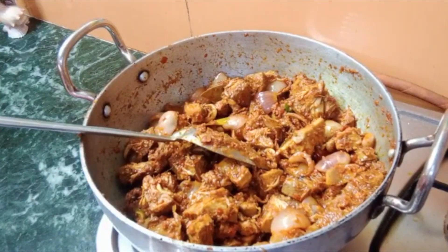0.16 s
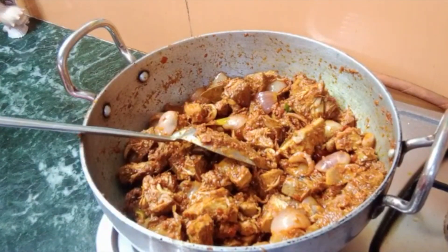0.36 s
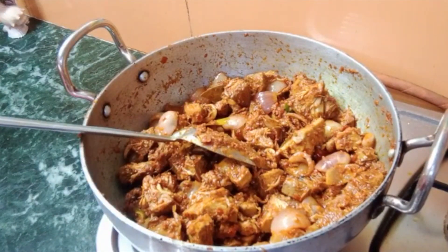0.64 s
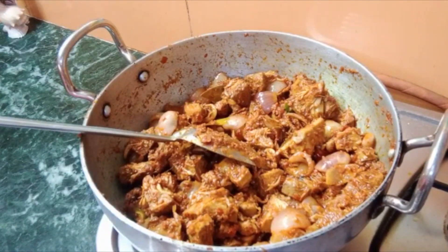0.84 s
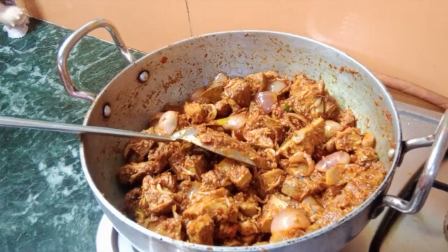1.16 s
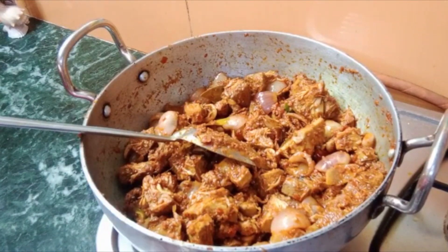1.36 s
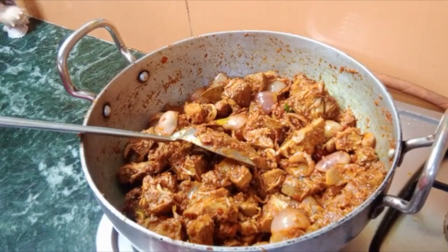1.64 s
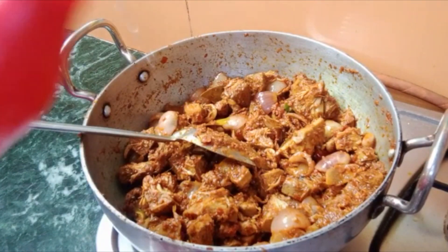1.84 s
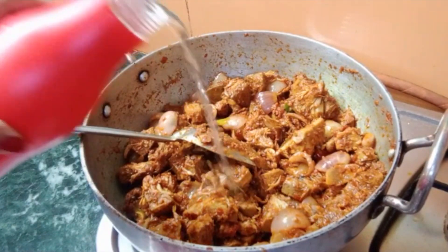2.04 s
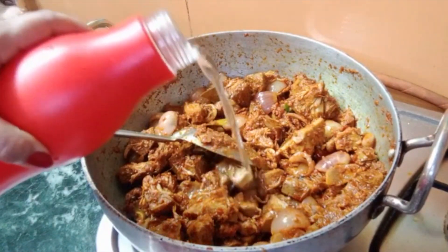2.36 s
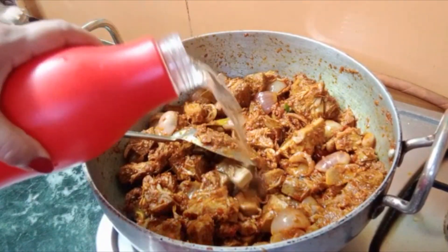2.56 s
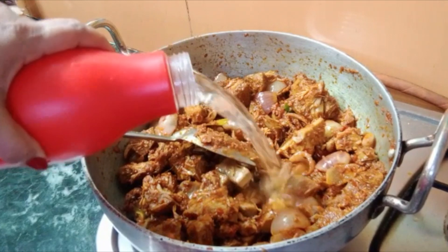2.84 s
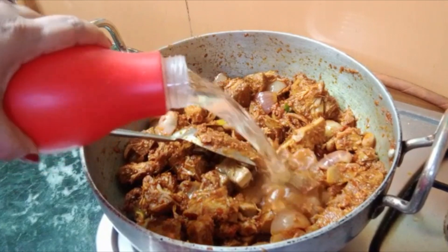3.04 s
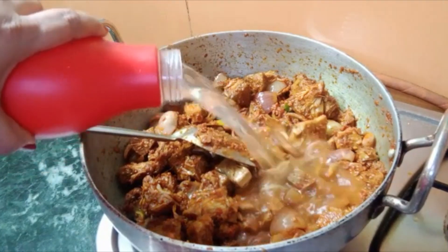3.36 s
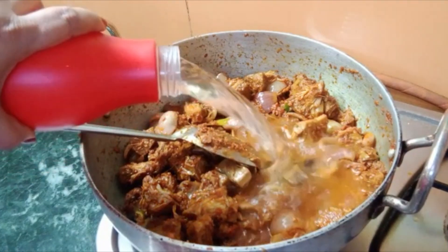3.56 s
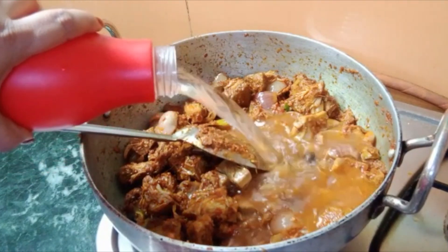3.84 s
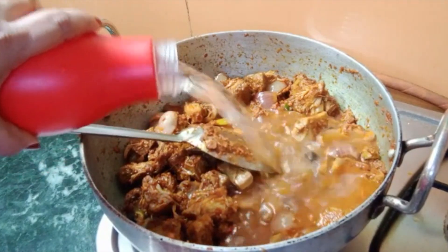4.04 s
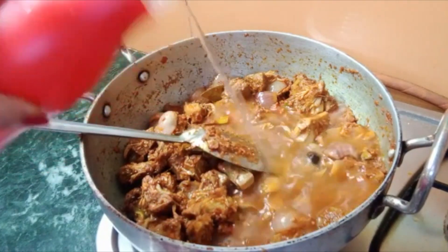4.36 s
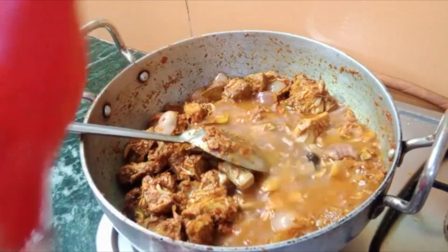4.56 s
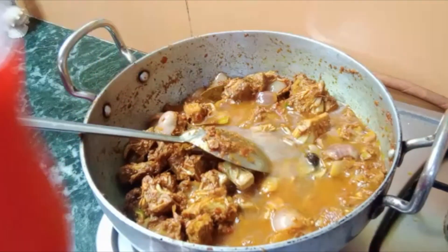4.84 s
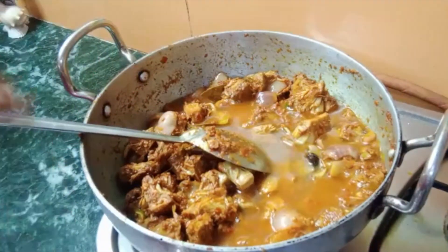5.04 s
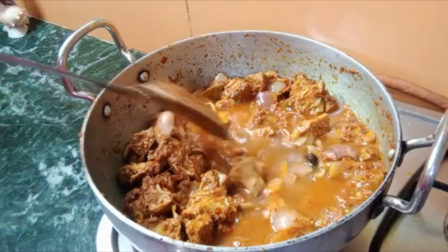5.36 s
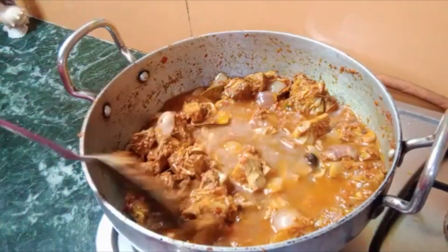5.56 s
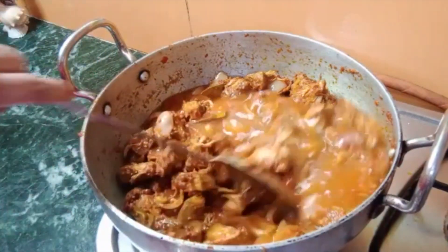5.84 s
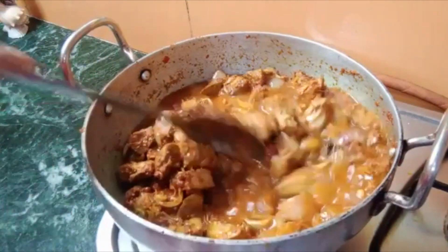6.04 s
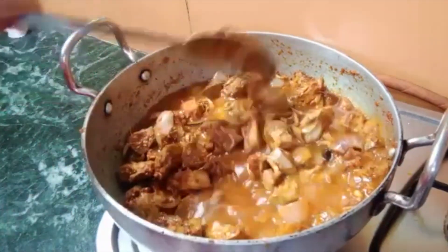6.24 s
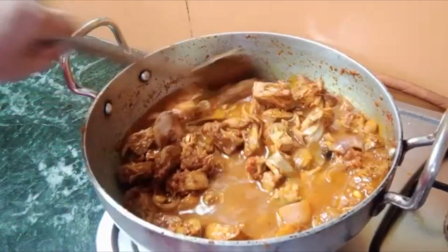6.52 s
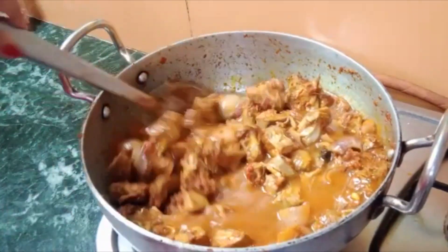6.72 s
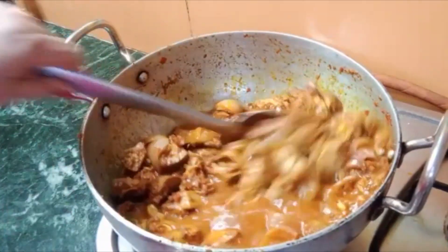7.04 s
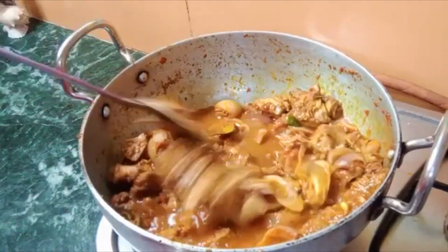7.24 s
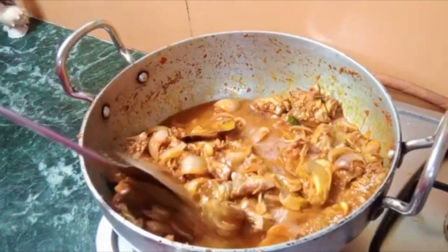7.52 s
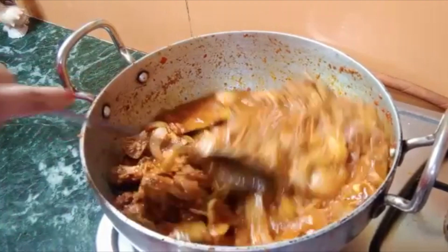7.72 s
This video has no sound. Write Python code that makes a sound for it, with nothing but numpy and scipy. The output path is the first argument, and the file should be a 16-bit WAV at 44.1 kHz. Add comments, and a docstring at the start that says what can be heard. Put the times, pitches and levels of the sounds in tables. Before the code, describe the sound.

Spiced food sizzles in a metal pan, a spatula clanks, water gurgles in and dulls the hiss, then stirring knocks and scrapes flare the frying up.

```python
"""Frying in a wok

Spiced meat fries in a metal wok over a gas flame: steam bursts hiss, gravy bubbles sputter and burble.
A dropped steel spatula rings the pan and its own blade; poured water gurgles and comes to a simmer.
Then the spatula knocks and scrapes through the food, and the hot metal flares up again.
Hiss and flame are shaped noise, bubbles are short rising tones, and metal is a set of fading notes.
A small kitchen adds short reflections."""
import sys
import numpy as np
from scipy import signal
from scipy.fft import rfft, irfft, next_fast_len
from scipy.io import wavfile

SR = 44100
rng = np.random.default_rng(int(sys.argv[2]) if len(sys.argv) > 2 else 0)


def transcribe(signal):
    """Save signal, clipped to [-1, 1], as a 16-bit WAV file at the path in sys.argv[1]."""
    frames = np.atleast_2d(signal).T
    limited = np.clip(frames, -1, 1)
    pcm = np.round(limited * 32767).astype(np.int16)
    wavfile.write(sys.argv[1], SR, pcm)


N = 347949
TIME = np.arange(N) / SR  # s

# All levels below are relative: the functions add fixed offsets when they mix.
# How hard the food fries; water quenches it, stirring bares hot metal:
# [t/s, steam hiss level/dB, gravy sputter level/dB]
FRYING = [(0, -37.5, -30.5), (2.3, -36.5, -35), (3.6, -40, -33.5), (4.25, -42.5, -47), (4.65, -43.5, -35),
          (4.95, -47, -36), (5.3, -46, -34), (5.48, -55.5, -34.5), (5.8, -40, -40), (6.085, -52.5, -50),
          (6.115, -62, -38.5), (6.33, -40, -42.5), (6.435, -42, -40), (6.465, -36.5, -23.5),
          (6.9, -35.5, -31.5), (7.27, -40, -33.5), (7.55, -49.5, -39.5), (7.89, -61, -45)]
# How far water has quenched the metal: [t/s, share 0-1]
WETNESS = [(3, 0), (4.1, 0.54), (6.3, 0.67), (6.6, 0.06)]
# Liquid hitting bare hot metal throws up extra spray: [t/s, level/dB, rise/(dB/s), fall/(dB/s)]
FLASHES = [(3.95, -38.5, 6, 10), (6.42, -29, 86, 15)]
# Colour of the steam hiss: [f/Hz, level/dB]
HISS_COLOUR = [(300, -39), (880, -18), (1100, -13), (1500, 1), (2300, -2), (2900, 0), (4200, -1),
               (5600, -2), (7300, -2.5), (8500, -8), (12000, -12)]
# Colour of the finest spray: [f/Hz, level/dB]
SPRAY_COLOUR = [(4000, -19), (6500, -2), (8500, 2.5), (11000, -1.5), (15500, -2)]
# Bubble sizes in the sputter: [f/Hz, level/dB]
SPUTTER_SIZES = [(2700, -5.5), (3100, -6), (3500, -6.5), (3950, -7), (4450, -14), (5000, -9), (5600, -5.5)]
# Hollow of the wok, as resonances: [f/Hz, width/Hz, level/dB]
BOWL_RESONANCES = [(708, 50, -4.5), (1085, 180, -3), (1258, 125, 5)]
# Colour of the gas flame: [f/Hz, level/dB]
FLAME_COLOUR = [(30, -15), (50, -11), (65, 1.5), (115, -0.5), (150, 7.5), (190, 1.5), (270, -7),
                (500, -5.5), (900, -31), (2500, -58)]
# Pockets of steam burbling under the food: [t/s, level/dB]
BURBLES = [(0.025, -34), (0.109, -42), (0.231, -32), (0.35, -26.5), (0.524, -37), (0.709, -35),
           (1.014, -36), (1.324, -43), (1.41, -42), (1.577, -31.5), (1.795, -40), (1.92, -33), (2.4, -40),
           (2.645, -34.5), (2.902, -36), (5.808, -36), (6.086, -37), (6.812, -34), (6.99, -41),
           (7.424, -35)]
# Spatula and food striking the pan: [t/s, level/dB, lowest f/Hz, highest f/Hz, chatter/s,
# clatter t60/s, wok ring level/dB, favoured note f/Hz, blade ring level/dB]
KNOCKS = [(0.321, -12.5, 360, 7000, .003, 0.22, -5.5, 395, -2),
          (0.33, -13.5, 454, 9000, 0.04, 0.25, -13, 1690, 7.5),
          (0.41, -17.5, 600, 6500, .012, 0.14, -5, 1255, -6),
          (0.445, -27, 416, 990, 0.0044, 0.081, -12, 675, -30),
          (3.091, -18, 150, 600, .005, .06, -16, 370, -40),
          (3.0909, -21.5, 1200, 2800, .007, 0.079, -8, 1690, -30),
          (5.856, -19, 400, 1820, .0025, 0.079, -8, 1255, -40),
          (5.932, -22, 480, 1000, .006, .15, 6, 835, -40),
          (6.271, -15, 189, 2300, 0.0051, 0.22, -2, 575, -23),
          (6.535, -16, 276, 695, .006, .14, 0, 370, -27), (6.575, -9, 160, 1100, .0073, 0.29, -7, 222, -40),
          (6.5955, -8.5, 170, 3580, 0.007, 0.22, -6, 1255, -22),
          (7.605, -12, 1000, 3800, 0.0076, 0.15, -5, 1420, -32),
          (7.6045, -15.5, 270, 557, .003, 0.071, -4, 370, -43),
          (7.61, -13.5, 440, 750, .004, 0.13, 10, 620, -40),
          (7.6121, -15.5, 1700, 2950, .006, .14, 2, 2620, -19),
          (7.636, -24.5, 1500, 7000, .004, 0.18, -10, 2790, -17),
          (7.742, -23, 1080, 1750, .012, 0.15, -13, 1240, -40),
          (7.8025, -17, 520, 1260, .003, .1, -1, 835, -40),
          (7.8128, -16, 644, 1500, .0035, 0.12, -2, 835, -40),
          (7.816, -24.5, 1900, 4870, .01, 0.13, 1, 4590, -40)]
# Notes of the wok, damped by the food: [f/Hz, level/dB, t60/s]
WOK_MODES = [(223.4, 0, .14), (297, 2, .11), (374, 3, 0.11), (508, -1, 0.11), (580, 0.5, 0.16),
             (683, 1, 0.1), (833, -3.5, 0.13), (1128, 0.5, 0.15), (1261, 2.5, 0.15), (1437, -2.5, 0.17),
             (1710, 0.5, 0.11), (1956, 0, 0.13), (2300, -4, .12), (2636, 2, .125), (2760, -4, .11),
             (3070, -4, .12), (3350, -9, 0.12), (3630, -1.5, 0.13), (4390, -2, 0.08)]
# Notes of the steel blade: [f/Hz, level/dB, t60/s]
BLADE_MODES = [(5335, 9, 0.15), (5650, 2.5, 0.13), (6330, -2, .12), (7959, 13, .15), (8845, -4, .12),
               (10981, 7, 0.11), (12610, -2, .12), (14980, -10, 0.082)]
# Drops spitting on hot metal at set times: [t/s, level/dB, f/Hz]
SPITS = [(2.305, -27, 10000), (3.361, -43, 3310), (3.428, -29.5, 3600), (3.464, -30, 3300),
         (3.816, -33.5, 4070), (3.996, -32, 4200), (4.034, -25.5, 3700), (4.059, -29, 6400),
         (4.287, -33, 4120), (4.37, -24.5, 4200), (4.492, -33, 3170), (4.65, -32, 5240), (5.034, -32, 3050),
         (5.117, -34, 3150), (5.263, -21, 1340), (5.266, -26, 3600), (5.488, -21, 1280), (5.554, -33, 5160),
         (5.6, -43, 5100), (6.11, -36, 3320), (6.197, -39, 3130), (6.254, -31, 3920), (6.83, -24.5, 3220)]
# Surges of the pour, then of the stirred gravy: [peak t/s, level/dB, fall/(dB/s)]
SURGES = [(2.949, -33.5, 17), (3.56, -31.5, 23.5), (4.2, -34.5, 15), (4.68, -34, 23), (5.05, -36, 21),
          (5.98, -33.5, 74), (6.68, -33, 32)]
# Gulps of the falling stream and wet thumps of stirred gravy: [t/s, level/dB, starting f/Hz]
GULPS = [(2.959, -30.5, 550), (3.092, -19, 173), (3.094, -25, 343), (3.111, -23.5, 550), (3.52, -41, 407),
         (4.119, -32, 310), (4.22, -30, 293), (4.248, -35, 229), (4.304, -34, 204), (4.329, -23, 166),
         (5.855, -23.5, 308), (5.878, -24.5, 238), (5.916, -24, 492), (5.975, -28, 270),
         (6.231, -30.5, 225), (6.27, -23.5, 225), (6.281, -23, 564), (7.756, -26, 298), (7.769, -23.5, 598),
         (7.771, -29, 188), (7.787, -26, 298), (7.802, -21, 238)]
# Gravy runs over a hot spot and a patch of like-sized bubbles fizzes up:
# [t/s, length/s, level/dB, first f/Hz, last f/Hz, pitch spread/octaves]
PATCHES = [(4.638, 0.29, -32, 1630, 1720, .05), (4.718, 0.55, -38.5, 3000, 3120, 0.056),
           (5.21, 0.19, -37, 3470, 4300, 0.18), (5.545, .12, -36, 4800, 5900, 0.33),
           (5.793, 0.068, -34, 3700, 3200, 0.32), (6.076, 0.33, -39.5, 5430, 5240, 0.082),
           (6.102, 0.12, -43, 3600, 3470, .06), (6.361, 0.15, -37, 1620, 2380, 0.13),
           (6.621, 0.54, -36, 612, 1036, 0.214), (6.666, 0.2, -31, 5750, 5700, .12),
           (6.792, 0.25, -26.5, 3250, 2850, 0.16), (6.951, 0.37, -32, 3370, 4700, 0.18),
           (7.35, 0.22, -42, 2070, 2030, 0.035), (7.437, 0.2, -45, 3100, 3940, .1)]
# Spatula dragged over the metal: [t/s, length/s, level at the end/dB, swell/dB,
# first f/Hz, last f/Hz, bowl ring level/dB]
SCRAPES = [(5.868, 0.071, -22, 4, 300, 744, -20), (5.96, 0.039, -33, 9, 754, 724, -5),
           (6.285, 0.046, -31, 3, 450, 567, -17), (6.456, 0.01, -22, 8, 2600, 3080, -5),
           (6.49, 0.122, -28.5, 4.5, 2800, 1890, 11.5), (6.61, 0.026, -28, -4, 3300, 3300, -9),
           (7.748, 0.1, -27.5, 0.5, 292, 666, -31)]
# Colour the microphone adds: [f/Hz, level/dB]
MICROPHONE_COLOUR = [(30, -18), (70, -2.5), (5700, 0), (6300, -3.5), (6800, 1), (7400, -2), (8100, -14),
                     (9000, -6.5), (11000, -7.5), (13800, -17), (15100, -7)]

SPRAY_DB, SPRAY_FOLLOWS = -36.5, 0.81  # finest spray at the start; share of the hiss's swing
HISS_PATCHY_DB = 3.4  # depth of the patches at full wetness
SPUTTER_SPREAD_DB, GURGLE_SPREAD_DB = 12, 11  # how far bubble strengths differ
SIMMER_DB, SIMMER_FOLLOWS = -30, 0.38  # hum of the bowl at the start; share of the sputter's swing
SWARM_DB, SWARM_FOLLOWS = -34, 0.83  # small bubbles, likewise
BOIL_PEAK_S, BOIL_CLUMP_DB = 4.77, 2.5  # peak of the boil; clumping of its bubbles at full wetness
BOIL_DB, BOIL_RISE_DB_PER_S, BOIL_FALL_DB_PER_S = -28, 25, 12  # poured water boils up and settles
BOIL_HUM_DB, BOIL_HUM_RISE_DB_PER_S, BOIL_HUM_FALL_DB_PER_S = -28, 13.5, 29  # the bowl's share of it
COOL_FROM_S, COOL_DB_PER_S = 6.96, 11.5  # once all is mixed, the bubbling dies away
FLAME_DB, FLAME_FLUTTER_DB = -45, 4  # level and depth of its flutter
BURBLE_HZ, BURBLE_ATTACK_S, BURBLE_T60_S = 147.8, 0.012, 0.22  # typical pitch; shared by all burbles
MODE_SPREAD_DB = 1.5  # random change in each struck note
FAVOUR_DB, FAVOUR_OCTAVES = 9, 0.11  # the spot struck brings out the notes near its favourite
THUD_DB, THUD_T60_S = -17, 0.3  # level relative to the knock's own table level
RANDOM_SPITS_PER_S, RANDOM_SPIT_DB = 12, 4.5  # spits at random times; level relative to the sputter table
SURGE_RISE_DB_PER_S = 48
PATCH_BUBBLES_PER_S, PATCH_RING_CYCLES, PATCH_SPREAD_DB = 2300, 28, -1  # shared by all patches
SCRAPE_ATTACK_S, SCRAPE_RELEASE_DB_PER_S = 0.0031, 382  # shared by all strokes
CLANK_S, CLANK_DB, CLANK_HZ, CLANK_T60_S = 6.5955, 0.5, 1243, 0.043
WALL_ECHO_S, KITCHEN_T60_S, SIDE_NOISE_DB = 0.00676, 0.18, -70
CUTOFF_HZ = 15600


def from_db(db):
    """Turn decibels into gain."""
    return 10 ** (np.asarray(db) / 20)


def rms_one(x):
    """Scale a sound to unit power."""
    return x / np.sqrt(np.mean(x ** 2) + 1e-20)


def in_time(rows):
    """Read each column of a curve at every sample."""
    s, *columns = np.transpose(rows)
    return [np.interp(TIME, s, c) for c in columns]


def swell(s, db, rise_db_per_s, fall_db_per_s):
    """Make a gain that climbs to a peak and dies away."""
    return from_db(db - np.maximum((s - TIME) * rise_db_per_s, (TIME - s) * fall_db_per_s))


def add(track, s, sound):
    """Mix a sound into a track at a given time."""
    at = int(s * SR)
    track[at:at + len(sound)] += sound[:max(N - at, 0)]


def colour(x, spectrum):
    """Filter by a smooth spectrum."""
    size = next_fast_len(N + 4096)
    hz, db = np.transpose(spectrum)
    gain = from_db(np.interp(np.log(np.fft.rfftfreq(size, 1 / SR) + 1), np.log(hz), db))
    return irfft(rfft(x, size) * gain, size)[..., :N]


def band(x, low_hz, high_hz, order=2):
    """Keep only the frequencies between two limits."""
    high_hz = min(max(high_hz, low_hz + 20), SR / 2 - 20)
    sos = signal.butter(order, [low_hz, high_hz], "band", fs=SR, output="sos")
    return signal.sosfilt(sos, x + 1e-18)


def drift(rate_hz):
    """Wander slowly at random, with unit power."""
    # worked out at every 40th sample; the first 2000 points let the filter settle
    r = np.exp(-80 * np.pi * rate_hz / SR)
    slow = signal.lfilter([1], [1, -2 * r, r * r], rng.standard_normal(N // 40 + 2002))[2000:]
    return np.interp(np.arange(N) / 40, np.arange(len(slow)), rms_one(slow))


def clicks(per_s, spread_db):
    """Scatter random clicks: many small, a few large."""
    sizes = from_db(spread_db * np.minimum(rng.exponential(1, N), 5)) * rng.choice([-1, 1], N)
    return rms_one(sizes * (rng.random(N) < per_s / SR))


def bursts(per_s, spread_db, length_s):
    """Scatter short puffs of noise, many small and a few large, at unit power."""
    decay = np.exp(-1 / (length_s * SR))
    power = signal.lfilter([1], [1, -decay], clicks(per_s, spread_db) ** 2 + 1e-18)
    return rms_one(np.sqrt(power) * rng.standard_normal(N))


def bubbles(per_s, low_hz, high_hz, cycles, rise, spread_db):
    """Ring each bubble for some cycles, rising in pitch as it nears the surface; unit power."""
    when, size, strength = rng.random((int(per_s * N / SR), 3)).T[:, :, None]
    step = np.arange(int(cycles * SR / low_hz))
    hz = low_hz * (high_hz / low_hz) ** size
    age = (step * hz / (cycles * SR)).astype(np.float32)  # 1 = the ring's full number of cycles
    tone = np.exp(-2 * np.pi * age) * np.sin(2 * np.pi * cycles * age * (1 + rise * age))
    rings = from_db(spread_db * strength ** 4) * tone
    at = (when * N).astype(int) + step
    return rms_one(np.bincount(at.ravel(), rings.ravel(), N)[:N])


def ringing(modes, t):
    """Ring struck notes, each with a strength and sign of its own."""
    out = 0
    for hz, db, t60 in modes:
        gain = from_db(db + rng.normal(0, MODE_SPREAD_DB) - 60 * t / t60) * rng.choice([-1, 1])
        out = out + gain * np.sin(2 * np.pi * hz * t)
    return out


def bowl(x):
    """The hollow of the wok hums along with what happens in it, through a few resonances."""
    out = 0
    for k, (hz, width_hz, db) in enumerate(BOWL_RESONANCES):
        r = np.exp(-np.pi * width_hz / SR)
        feedback = [1, -2 * r * np.cos(2 * np.pi * hz / SR), r * r]
        hum = signal.lfilter([(1 - r * r) / 2, 0, (r * r - 1) / 2], feedback, x)
        out = out + (-1) ** k * from_db(db) * hum
    return rms_one(out)


def patchy(x, depth_db):
    """Let each third of an octave come and go on its own."""
    size = next_fast_len(N)
    thirds = np.clip(3 * np.log2(np.fft.rfftfreq(size, 1 / SR) / 1900 + 1e-9), 0, 6)
    whole = rfft(x, size)
    out = 0
    for k in range(7):
        part = irfft(whole * np.maximum(1 - abs(thirds - k), 0), size)[:N]
        out = out + part * from_db(depth_db * drift(9.5))
    return out


def frying():
    """Thousands of tiny steam bursts merge into a hiss that water makes patchy, under crackle and spray."""
    hiss_db, _ = in_time(FRYING)
    wet, = in_time(WETNESS)
    flash = np.max([swell(*row) for row in FLASHES], axis=0)
    spray_gain = np.hypot(from_db(SPRAY_DB + SPRAY_FOLLOWS * (hiss_db - hiss_db[0])), flash)
    surge = drift(25.0)  # shared by hiss and spray
    crackle = bursts(per_s=200, spread_db=2.0, length_s=0.00097)
    steam = bursts(per_s=8700, spread_db=0.5, length_s=0.000097)
    hiss = rms_one(colour(steam + from_db(-9.0) * crackle, HISS_COLOUR))
    mist = bursts(per_s=6700, spread_db=1.5, length_s=0.00067)
    spray = rms_one(colour(mist + from_db(-6.5) * crackle, SPRAY_COLOUR))
    hiss = patchy(hiss, HISS_PATCHY_DB * wet) * from_db(hiss_db + 8.0 + 0.42 * surge)
    return hiss + spray * spray_gain * from_db(0.94 * surge + 1.7 * drift(25))


def sputter():
    """Tiny bubbles burst where gravy meets hot metal; wetness clumps each size in its own rhythm."""
    _, level_db = in_time(FRYING)
    wet, = in_time(WETNESS)
    clump_db = 1 + 2.6 * wet
    out = 0
    for hz, db in SPUTTER_SIZES:
        swarm = bubbles(per_s=240, low_hz=hz / 1.093, high_hz=hz * 1.068, cycles=36, rise=0.016,
                        spread_db=SPUTTER_SPREAD_DB)
        out = out + swarm * from_db(db + clump_db * drift(7.7))
    return out * from_db(level_db - 2.5)


def boiling():
    """Wet bursts drum on the bowl and small bubbles swarm; both follow the sputter and swell at the boil."""
    _, sputter_db = in_time(FRYING)
    wet, = in_time(WETNESS)
    vigour_db = sputter_db - sputter_db[0]
    boil = swell(BOIL_PEAK_S, BOIL_DB, BOIL_RISE_DB_PER_S, BOIL_FALL_DB_PER_S)
    hum = swell(BOIL_PEAK_S, BOIL_HUM_DB, BOIL_HUM_RISE_DB_PER_S, BOIL_HUM_FALL_DB_PER_S)
    simmer = rms_one(band(bowl(clicks(per_s=2500, spread_db=3.0)), 690, 3000))
    swarm = bubbles(per_s=800, low_hz=1483, high_hz=2200, cycles=37.0, rise=0.062, spread_db=10.5)
    swarm = swarm * from_db(BOIL_CLUMP_DB * wet * drift(26))
    simmer_gain = np.hypot(from_db(SIMMER_DB + SIMMER_FOLLOWS * vigour_db), hum)
    swarm_gain = np.hypot(from_db(SWARM_DB + SWARM_FOLLOWS * vigour_db), boil)
    cooling = from_db(-COOL_DB_PER_S * np.maximum(TIME - COOL_FROM_S, 0))
    return (simmer * simmer_gain + swarm * swarm_gain) * cooling


def flame():
    """The gas flame is low noise with a random flutter, limited on its loud side."""
    roar = rms_one(colour(rng.standard_normal(N), FLAME_COLOUR))
    return roar * from_db(FLAME_DB + FLAME_FLUTTER_DB * np.minimum(drift(7.3), 1.7))


def burbles():
    """A pocket of steam lifts the thick paste with a short, soft, low note."""
    out, age = np.zeros(N), TIME[:SR // 3]
    for s, db in BURBLES:
        hz = BURBLE_HZ * (1 + rng.normal(0, 0.074))
        fade = from_db(db + 8.0 - 60 * age / BURBLE_T60_S)
        add(out, s, fade * (1 - np.exp(-age / BURBLE_ATTACK_S)) * np.sin(2 * np.pi * hz * age))
    return out


def knocks():
    """A chattering contact rings wok and blade; each spot favours a note and food dulls the blow."""
    out, t = np.zeros(N), TIME[:SR // 4]
    for s, db, low_hz, high_hz, chatter_s, clatter_t60_s, wok_db, note_hz, blade_db in KNOCKS:
        contact = rms_one(rng.standard_normal(len(t)) * np.exp(-t / chatter_s))
        clatter = rng.standard_normal(len(t)) * from_db(-60 * t / clatter_t60_s)
        clatter = rms_one(band(clatter, 65, 1600, order=1))
        modes = []
        for hz, mode_db, t60 in WOK_MODES:
            closeness = np.exp(-(np.log2(hz / note_hz) / FAVOUR_OCTAVES) ** 2)
            modes.append((hz, mode_db + FAVOUR_DB * closeness, t60))
        wok = from_db(wok_db) * rms_one(ringing(modes, t))
        blow = rms_one(band(wok + contact + clatter, low_hz, high_hz, order=3))
        # the blade's many weak notes blur into a bright crash around the strong ones
        crash = rms_one(band(rng.standard_normal(len(t)) * from_db(-60 * t / 0.14), 4500, 19000))
        blade = rms_one(ringing(BLADE_MODES, t)) + from_db(-3.0) * crash
        add(out, s, from_db(db - 14.0) * (blow + from_db(blade_db - 3.5) * blade))
    return out


def thuds():
    """Every blow rocks the wok on its stand: a fading low noise."""
    out, t = np.zeros(N), TIME[:SR // 3]
    for s, db, *_ in KNOCKS:
        rumble = rms_one(band(rng.standard_normal(len(t)), 103, 213))
        add(out, s, from_db(db + THUD_DB - 60 * t / THUD_T60_S) * rumble)
    return out


def spits():
    """A drop flashes to steam in a short burst; from the pour on, more spits come at random times."""
    out, t = np.zeros(N), TIME[:SR // 10]
    _, sputter_db = in_time(FRYING)
    wet_s = TIME[-1] - SURGES[0][0]
    random_spits = []
    for back, weak, size in rng.random((int(RANDOM_SPITS_PER_S * wet_s), 3)):
        s = TIME[-1] - wet_s * back
        db = np.interp(s, TIME, sputter_db) + RANDOM_SPIT_DB - 6 * weak
        random_spits.append((s, db, 2200 * 4.7 ** size))
    for s, db, hz in [*SPITS, *random_spits]:
        burst = rms_one(band(rng.standard_normal(len(t)), hz / 1.143, hz * 1.164))
        add(out, s, burst * from_db(db + 1.0 - 60 * t / 0.1))
    return out


def water():
    """The stream and stirred gravy trap larger bubbles that gurgle in surges; the largest gulp."""
    flow = np.max([swell(s, db, SURGE_RISE_DB_PER_S, fall) for s, db, fall in SURGES], axis=0)
    spread = GURGLE_SPREAD_DB
    large = bubbles(per_s=90, low_hz=311, high_hz=552, cycles=20.5, rise=0.12, spread_db=spread)
    small = bubbles(per_s=130, low_hz=639, high_hz=1150, cycles=43, rise=0.17, spread_db=spread)
    plinks = bubbles(per_s=70, low_hz=1147, high_hz=2300, cycles=43, rise=0.094, spread_db=spread)
    out = (from_db(-4.5) * large + from_db(-2.5) * small + from_db(-3.5) * plinks) * flow
    age = TIME[:SR // 6]
    for s, db, hz in GULPS:
        envelope = from_db(db + 6.0 - 60 * age / 0.095) * (1 - np.exp(-age / 0.00087))
        add(out, s, envelope * np.sin(2 * np.pi * hz * age * (1 + 1.47 * age)))  # pitch rises
    return out


def patches():
    """Each patch swells and fades while its many ringing bubbles slide in pitch."""
    out, age = np.zeros(N), TIME[:SR // 40]
    for s, length_s, db, first_hz, last_hz, octaves in PATCHES:
        count = int(PATCH_BUBBLES_PER_S * length_s)
        along = np.sort(rng.random(count))[:, None]
        size, strength = rng.standard_normal((count, 2)).T[:, :, None]
        hz = first_hz * (last_hz / first_hz) ** along * 2 ** (octaves * size)
        tone = np.exp(-np.pi * hz * age / PATCH_RING_CYCLES) * np.sin(2 * np.pi * hz * age)
        rings = from_db(PATCH_SPREAD_DB * strength) * np.sin(np.pi * along) * tone
        at = (along * length_s * SR).astype(int) + np.arange(len(age))
        fizz = band(np.bincount(at.ravel(), rings.ravel()), min(first_hz, last_hz) * 0.68, 8600)
        add(out, s, from_db(db - 3.0) * rms_one(fizz))
    return out


def scrapes():
    """The blade sticks and slips; its rasp changes level, glides in pitch and sets the bowl ringing."""
    out, t = np.zeros(N), TIME[:SR // 4]
    slips = bursts(per_s=1500 * from_db(1.7 * drift(44)), spread_db=2.0, length_s=0.00042)
    # octave-wide bands, crossfaded below to make the pitch glide
    rasps = {hz: rms_one(band(slips, hz / 2 ** .5, hz * 2 ** .5)) for hz in 200 * 2.0 ** np.arange(6)}
    hum = bowl(slips)
    for k, (s, length_s, db, swell_db, first_hz, last_hz, bowl_db) in enumerate(SCRAPES):
        part = slice(k * len(t), (k + 1) * len(t))  # fresh noise for each stroke
        along = np.minimum(t / length_s, 1)
        pitch_hz = first_hz * (last_hz / first_hz) ** along
        rasp = sum(x[part] * np.exp(-(np.log2(hz / pitch_hz) / 1.28) ** 2) for hz, x in rasps.items())
        release_db = SCRAPE_RELEASE_DB_PER_S * np.maximum(t - length_s, 0)
        gain = np.minimum(t / SCRAPE_ATTACK_S, 1) * from_db(db - swell_db * (1 - along) - release_db)
        add(out, s, gain * (rms_one(rasp) + from_db(bowl_db) * rms_one(hum[part])))
    return out


def clank():
    """The long stroke ends hard against the bottom and rings the bowl's main note."""
    out = np.zeros(N)
    note = ringing([(CLANK_HZ, 0, CLANK_T60_S)], TIME[:SR // 5])
    add(out, CLANK_S, from_db(CLANK_DB) * band(note, 560, 2300))
    return out


def wall_echo(x, echo_db):
    """Sound bounces between the pan and the wall behind it, which ripples the spectrum."""
    lag, gain = int(WALL_ECHO_S * SR), min(from_db(echo_db), .7)
    echoes = sum((-gain) ** k * np.pad(x, (k * lag, 0))[:N] for k in range(6))
    return echoes * np.sqrt(1 - gain ** 2)


def kitchen(x, wet_db):
    """Add the dense, short reflections of a tiled corner to the direct sound, keeping its power."""
    t = TIME[:SR // 3]
    tail = rng.standard_normal(len(t)) * from_db(-60 * t / KITCHEN_T60_S) * (t > .002)
    wet = signal.fftconvolve(x, tail / np.linalg.norm(tail))[:N]
    return (x + from_db(wet_db) * wet) / np.hypot(1, from_db(wet_db))


def scene():
    """Mix close sources, nearly mono; groups of sounds have reflections of their own."""
    in_pan = (frying(), sputter() + spits(), patches() + boiling())
    food = sum(kitchen(x, wet_db=-5.5) for x in in_pan)
    stirring = wall_echo(water() + scrapes() + knocks(), echo_db=-10.5) + clank() + thuds()
    mid = food + kitchen(stirring, wet_db=-6.0) + burbles() + flame()
    # nearly mono: a very faint low noise and reverberant tail are added with opposite sign
    low_noise = rms_one(band(rng.standard_normal(N), 50, 450))
    side = from_db(-67.0) * kitchen(mid, wet_db=24) + from_db(SIDE_NOISE_DB) * low_noise
    return np.array([mid + side, mid - side])


def record(dry):
    """The microphone colours the sound, peaks are clipped and the top is cut."""
    heard = np.clip(colour(dry, MICROPHONE_COLOUR), -1, 1)
    return signal.sosfilt(signal.ellip(12, .1, 90, CUTOFF_HZ, fs=SR, output="sos"), heard)


dry = scene()
out = record(dry)
transcribe(out)
```